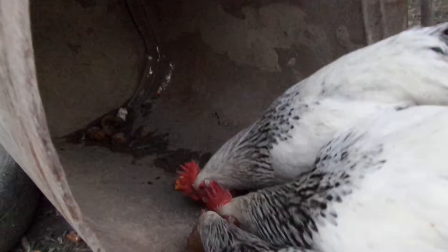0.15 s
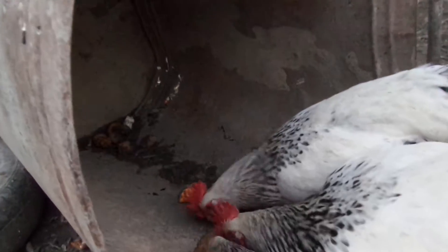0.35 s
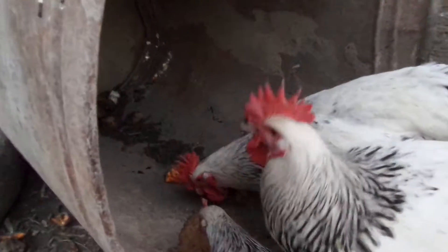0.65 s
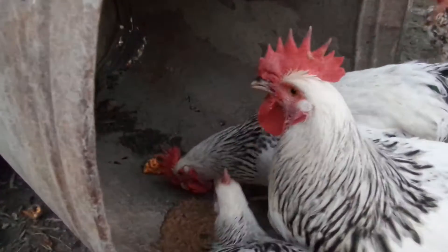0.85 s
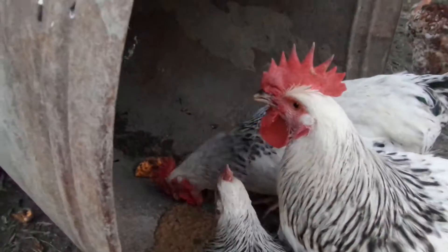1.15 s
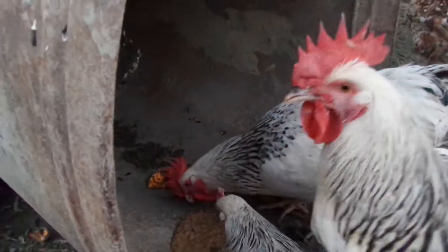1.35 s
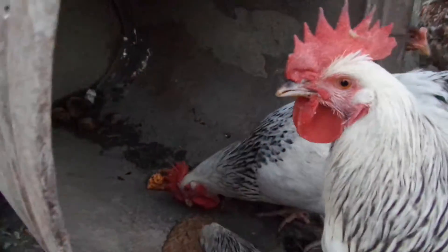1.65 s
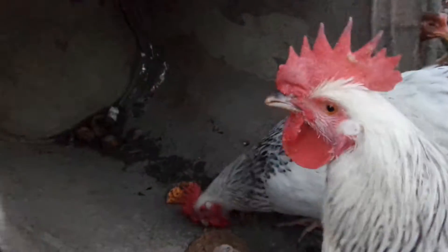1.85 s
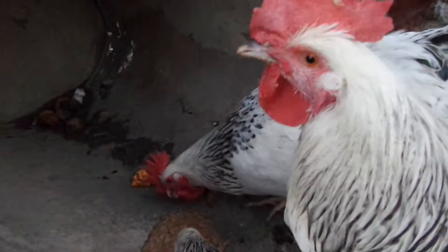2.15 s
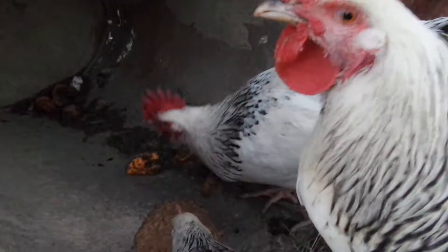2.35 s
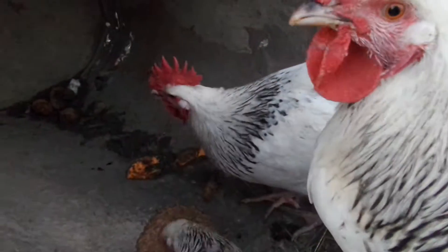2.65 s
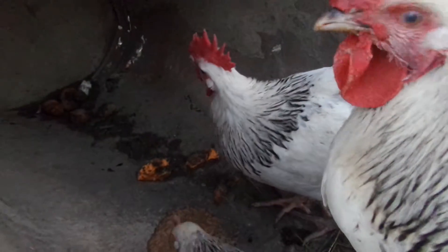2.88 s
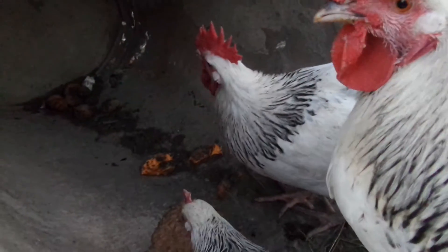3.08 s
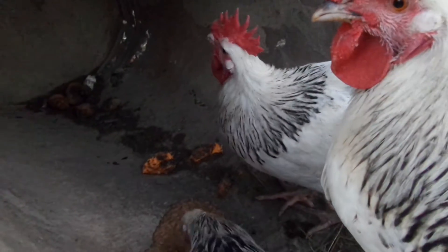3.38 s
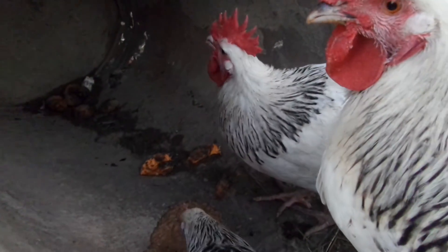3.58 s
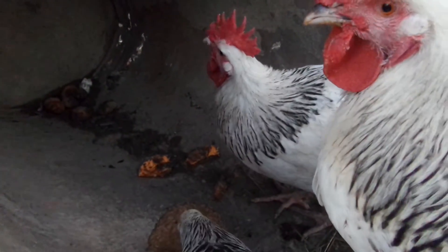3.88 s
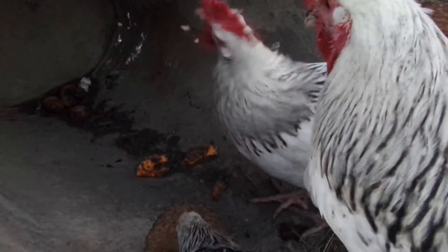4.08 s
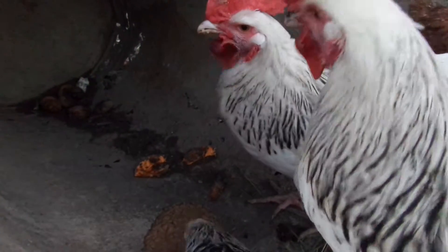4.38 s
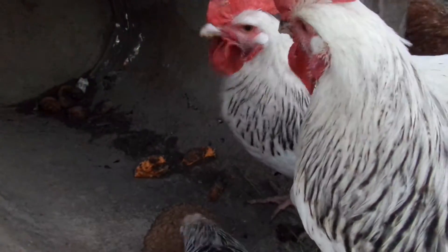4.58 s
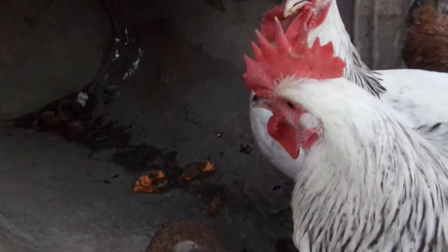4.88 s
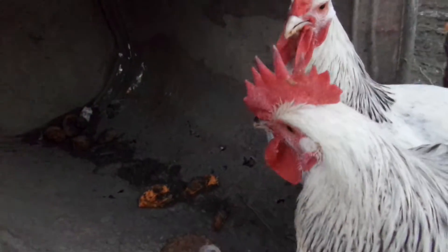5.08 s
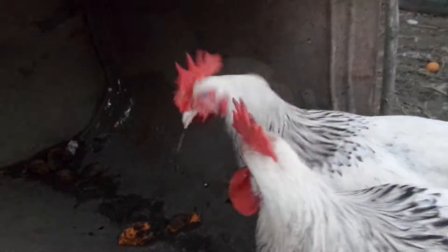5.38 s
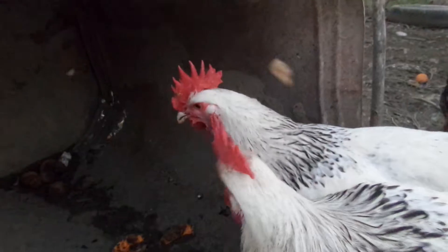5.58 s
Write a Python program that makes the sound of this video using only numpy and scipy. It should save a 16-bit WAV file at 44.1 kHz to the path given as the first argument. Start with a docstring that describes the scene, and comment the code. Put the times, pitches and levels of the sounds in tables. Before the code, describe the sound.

Close feeding hens with faint mutters, claw scrapes and dry ticks, a short run of clucks, and finally one long climbing squawk.

```python
"""Chickens feed in a concrete corner of a yard. A hen on the right clucks five times, others mutter and whine,
and the nearest bird ends with one long rising call: uneven pulses of the syrinx ring windpipe resonances;
the whines are gliding sine pairs. Beaks, claws, litter and low bumps are bursts of noise through a broad
resonance. Feathers and litter rustle as crackling noise, and far traffic and air hum as low shaped noise.
Sparse decaying taps give the reflections of the concrete."""
import sys
import numpy as np
from scipy import signal
from scipy.io import wavfile
from scipy.ndimage import uniform_filter1d

SR = 44100
rng = np.random.default_rng(int(sys.argv[2]) if len(sys.argv) > 2 else 0)


def wav_out(sig):
    """Save sig, one row per channel (or a flat mono array), as 16-bit PCM at SR to the path in sys.argv[1]."""
    wavfile.write(sys.argv[1], SR, np.round(np.clip(np.atleast_2d(sig).T, -1, 1) * 32767).astype(np.int16))


N = 252687
EDGE_HZ = 15850  # upper band limit


def gain_of(db):
    """Decibels to an amplitude factor."""
    return 10 ** (np.asarray(db) / 20)


def evened(x):
    """Scaled to rms 1."""
    return x / np.sqrt(np.mean(x ** 2) + 1e-20)


def smoothed_twice(x, size):
    """Two passes of a moving average of size samples."""
    return uniform_filter1d(uniform_filter1d(x, size=size), size=size)


def read(points, hz):
    """A spectrum table at the frequencies hz, interpolated along log frequency."""
    f, value = np.transpose(points)
    return np.interp(np.log(hz + 1), np.log(f + 1), value)


def add(mix, s, sound, pan_db=0, lag=0):
    """Mixes a sound in at s seconds; negative pan_db leans right, and the left side hears it lag samples late."""
    for side, (late, db) in enumerate([(lag, pan_db / 2), (0, -pan_db / 2)]):
        part = mix[side, round(s * SR) + late:][:len(sound)]
        part += gain_of(db) * sound[:len(part)]


def resonate(x, hz, width, order=2):
    """Shifts the curve hz down to zero, smooths order times, and shifts back: a steep resonance of gain 1."""
    turn = np.exp(2j * np.pi * np.cumsum(hz * np.ones(len(x))) / SR)
    r = np.exp(-np.pi * width / SR)
    smooth = signal.lfilter([(1 - r) ** order], np.poly([r] * order), x / turn + 1e-18)
    return 2 * (turn * smooth).real


def noise(colour, same, size, patchy_db, flicker_db):
    """Two-sided noise from random short-time spectra, with patches and a flicker shared by all bins."""
    frames, hz = 4 * N // size + 5, np.fft.rfftfreq(size, 1 / SR)
    a, b, c, d, patches = rng.standard_normal((frames, len(hz), 5)).T
    patches = uniform_filter1d(patches, size=12, axis=0)  # across frequency
    patches = evened(uniform_filter1d(patches, size=10, axis=1))  # across time
    jumps = np.minimum(rng.exponential(1, frames), 3) * (rng.random(frames) < .04)
    snaps = np.minimum(signal.lfilter([1], [1, -.88], jumps), 3.5)  # sudden rise, quick fade
    same = np.clip(same(hz), -1, 1)[:, None]  # left-right likeness
    left = a + 1j * b
    right = same * left + np.sqrt(1 - same ** 2) * (c + 1j * d)
    level_db = read(colour, hz)[:, None] + patchy_db * patches + flicker_db * snaps
    spectra = np.array([left, right]) * gain_of(level_db)
    return evened(signal.istft(spectra, nperseg=size, noverlap=3 * size // 4)[1][:, :N])


def voice(rows, pipe, breath=0.051):
    """Pulses of the syrinx, uneven in time and strength when rough, ring the windpipe.
    Rows: t/s, level/dB, pitch f/Hz, roughness 0-1, beak opening as a factor on the low resonances,
    and optionally brightness/dB on the high resonances."""
    s, *columns = np.transpose(rows)
    t = np.arange(s[0], s[-1], 1 / SR)
    effort_db, hz, rough, beak, *bright_db = (np.interp(t, s, c) for c in columns)
    jitter, force, hiss = rng.standard_normal((len(t), 3)).T
    jitter = evened(uniform_filter1d(jitter, size=150))
    turns = np.cumsum(hz * (1 + .35 * rough * jitter)) / SR  # cycles so far
    strength = gain_of(7.9 * rough * force[(turns + .5).astype(int)])  # each opening has its own force

    # the shape of the pulse keeps changing, so upper partials waver
    knots = np.arange(s[0], s[-1] + .05, .035)
    waver_db = 4.2 * rng.standard_normal((len(knots), 45)) * np.minimum(np.arange(45) / 4, 1) ** 2
    folds = 0
    for k in range(1, 45):
        partial = np.cos(2 * np.pi * k * turns) * (k * hz < EDGE_HZ)
        folds = folds + gain_of(np.interp(t, knots, waver_db[:, k])) * partial

    # hiss escapes at each opening
    air = (breath + 2.5 * rough) * hiss * np.exp(-(turns % 1) / .4)
    drive = folds * strength + air

    # the first three resonances move with the beak; neighbours alternate in sign
    low = sum((-1) ** k * gain_of(db) * resonate(drive, f * beak, w, order=4)
              for k, (f, w, db) in enumerate(pipe[:3]))
    high = sum((-1) ** k * gain_of(db) * resonate(drive, f, w) for k, (f, w, db) in enumerate(pipe[3:]))
    out = gain_of(sum(bright_db)) * high - low
    steady = np.sqrt(smoothed_twice(out ** 2, 500) + 1e-9)  # divided out, so the level curve rules
    fade = signal.windows.tukey(len(t), min(0.011 * SR / len(t), 1))
    return s[0], gain_of(effort_db) * out / steady * fade


def hits(events, width_share, grit_db, rise_s, trim_db, unlike, fizz):
    """A short burst of uneven noise rings a broad band around each pitch, a little different on each side.
    Events: t/s, level/dB before trim and pan, f/Hz, t60/s, pan/dB (negative leans right)."""
    mix, t = np.zeros((2, N)), np.arange(SR // 8) / SR
    for s, db, hz, t60, pan_db in events:
        common, apart, size = rng.standard_normal((3, len(t)))
        decay = gain_of(db + trim_db - 60 * t / np.clip(t60, .004, .4))
        shape = decay * (1 - np.exp(-t / rise_s)) * np.cos(4 * np.pi * t)  # the cosine ends the burst at zero
        grain = gain_of(grit_db * evened(uniform_filter1d(size, size=40)))
        for side, z in enumerate([common + unlike * apart, common - unlike * apart]):
            ringing = evened(resonate(z * grain, hz, width_share * hz))
            bright = evened(np.diff(z * grain, prepend=0))
            part = mix[side, round(s * SR):][:len(t)]
            burst = gain_of(pan_db * (1.5 - side)) * (ringing + fizz * bright) * shape
            part += burst[:len(part)]
    return mix


def yard_hum():
    """Far traffic and air: steady noise, heavy in the lows, alike on both sides only at low frequencies."""
    # spectrum of the hum: f/Hz, relative level/dB
    colour = [(12, -37), (30, -6), (60, 0), (80, 3), (110, -0.5), (189, 0), (403, -12.5), (707, -14.5),
              (813, -18), (1890, -19), (2640, -31), (5640, -30.5), (9100, -45.5), (15100, -25),
              (16400, -39)]
    # left-right likeness: f/Hz, correlation -1 to 1
    likeness = [(60, 0.88), (180, 0.97), (550, 0.56), (1650, -0.41), (4970, -0.25), (15000, -0.62)]
    hum = noise(colour, lambda hz: read(likeness, hz), size=2048, patchy_db=.8, flicker_db=0)
    return gain_of(-47.5 + np.array([[-1.9], [1.9]])) * hum  # leans right


def rustle():
    """Feathers and litter: fine crackling noise whose level follows the listed curve."""
    # level of the rustle; the swell near 5 s is partly the breath of the long call:
    # t/s, level/dB before the lean to the right
    curve = [(0, -49.5), (.19, -47.5), (.25, -60), (.53, -56.5), (.57, -52), (.78, -56), (.83, -46),
             (.98, -59), (1.18, -42), (1.35, -57), (1.4, -50), (1.52, -53), (1.92, -56.5), (1.98, -51),
             (2.39, -52.5), (2.57, -53.5), (2.65, -48.5), (2.71, -57), (2.84, -52), (2.89, -56.5),
             (2.99, -47.5), (3.32, -59), (3.43, -54.5), (3.7, -58), (4.13, -58.5), (4.17, -50.5),
             (4.38, -54), (4.44, -53.5), (4.74, -56), (4.94, -44.5), (5.38, -48.5), (5.73, -50)]
    # spectrum of the rustle: f/Hz, relative level/dB
    colour = [(590, -67), (1000, 3.5), (1490, -12), (1670, -2), (2090, -5), (2800, -6), (5650, -10),
              (9130, 2), (10500, -6), (15300, -8.5), (16400, -8)]
    crackle = noise(colour, lambda hz: .1 + 0 * hz, size=128, patchy_db=2.5, flicker_db=2.4)
    level_db = np.interp(np.arange(N) / SR, *np.transpose(curve))
    return crackle * gain_of(level_db + np.array([[-1.8], [1.8]]))


def mutter(s, length, db, hz, rough, beak, chest_db, bright_db):
    """A short soft note that swells and fades; the chest resonance stays put while the beak moves the next two."""
    # windpipe resonances of the flock: f/Hz, width/Hz, level/dB; the first level gives way to chest_db
    flock = [(280, 650, 1), (650, 280, 3), (950, 980, -2.5), (1300, 480, -7), (2000, 550, -2.5)]
    pipe = [(flock[0][0] / beak, flock[0][1], chest_db)] + flock[1:]
    end_hz = hz * (1 - 1.14 * length)  # pitch sags by a share of 1.14 a second
    rows = [(s, db, hz, rough, beak, bright_db), (s + length, db, end_hz, rough, beak, bright_db)]
    start, sound = voice(rows, pipe)
    swell = np.sin(np.linspace(s == 0, np.pi, len(sound)))  # a note at time 0 is already under way
    return start, 2 * sound * swell


def scrapes():
    """Claws scrape concrete: gritty mid-range bursts, wide across the two sides."""
    # scrapes: t/s, level/dB before trim and pan, f/Hz, t60/s
    claws = [(.1878, -33, 1410, .21), (0.219, -33, 1390, 0.029), (0.5, -41, 1800, 0.12),
             (0.7296, -28, 1800, 0.025), (0.752, -48, 1520, 0.04), (1.244, -40.5, 1820, .036),
             (1.61, -38, 1480, 0.037), (1.8521, -31, 1600, 0.069), (1.995, -27, 2120, 0.026),
             (2.0692, -35.5, 2000, 0.074), (2.097, -24, 1770, 0.042), (2.116, -30.5, 1370, 0.072),
             (2.4215, -34, 2640, 0.043), (2.5679, -43, 2000, 0.059), (4.517, -44, 1430, 0.14),
             (4.612, -42.5, 1580, 0.3), (5.332, -19.5, 1710, 0.06), (5.3568, -28.5, 1546, .11),
             (5.5754, -37.5, 3424, 0.041)]
    return hits([(*row, -4) for row in claws], width_share=0.59, grit_db=2.9, rise_s=0.0042,
                trim_db=5.5, unlike=0.72, fizz=0.032)


def pecks():
    """Beaks knock on the ground: fast-rising short bursts in the low mids."""
    # knocks: t/s, level/dB before trim and pan, f/Hz
    knocks = [(.313, -41, 816), (.364, -38.5, 1080), (.388, -36, 1110), (1.379, -31.5, 600),
              (1.425, -24, 710), (1.43, -27.5, 510), (5.535, -30, 990)]
    t60_s, pan_db = 0.026, -2.5
    return hits([(*row, t60_s, pan_db) for row in knocks], width_share=0.73, grit_db=2.3, rise_s=0.00041,
                trim_db=-0.24, unlike=0.52, fizz=0.054)


def ticks():
    """Grain and dry litter tick: very sharp, bright bursts."""
    # ticks: t/s, level/dB before trim and pan
    grains = [(0.6379, -44), (0.8035, -25), (0.869, -30.5), (1.3034, -34), (1.5565, -33), (1.9579, -41),
              (2.0567, -33), (2.0782, -30), (2.2136, -32.5), (2.3348, -29), (2.344, -34), (2.373, -34),
              (2.4413, -31.5), (2.522, -32), (2.613, -31), (2.826, -35), (2.9706, -29), (3.108, -37),
              (3.1487, -36.5), (3.2934, -50), (3.4261, -39), (3.5684, -32), (3.5778, -24), (3.5844, -34),
              (3.8457, -36.5), (3.9013, -37), (4.153, -29.5), (4.2133, -35), (4.4573, -43), (4.555, -38),
              (4.599, -35), (4.9492, -31), (5.471, -35), (5.6084, -39), (5.713, -43)]
    pitch_hz, t60_s, pan_db = 8900, .018, -4
    return hits([(s, db, pitch_hz, t60_s, pan_db) for s, db in grains], width_share=.7, grit_db=3, rise_s=.0003,
                trim_db=-3, unlike=.7, fizz=.6)


def low_bumps():
    """Low bumps: dull bursts of low noise."""
    # bumps: t/s, level/dB before trim and pan
    bumps = [(1.465, -30.5), (1.528, -33.5), (1.6, -39.5), (1.686, -32), (1.849, -28), (1.93, -33.5),
             (3.317, -56), (4.65, -28)]
    pitch_hz, t60_s, pan_db = 75, .16, -4.0
    return hits([(s, db, pitch_hz, t60_s, pan_db) for s, db in bumps], width_share=3.6, grit_db=2.5, rise_s=0.0068,
                trim_db=2.0, unlike=0.23, fizz=0)


def cluck(s, length, db, hz, end_hz, half_at, peak_at, rough):
    """Swells, holds and shuts while the pitch drops and the voice clears."""
    # windpipe resonances of the hen: f/Hz, width/Hz, level/dB; the beak scales the first three frequencies
    hen = [(515, 530, -2), (777, 420, 4.5), (950, 1100, -14), (1760, 690, -18), (3760, 750, -37)]
    beak, close_s, rough_floor = 1.034, .01, .13  # the floor is the share of roughness left at the end
    start_db, end_db = -10, -20  # relative to the held level
    u = np.linspace(0, 1, num=30)
    effort_db = db + np.interp(u, [0, peak_at, 1 - close_s / length, 1], [start_db, 0, 0, end_db])
    fallen = u ** (np.log(.5) / np.log(np.clip(half_at, .1, .9)))  # one half at half_at
    pitch = hz + (end_hz - hz) * fallen
    roughness = rough * (rough_floor + (1 - rough_floor) * (1 - u) ** 3)
    return voice(np.transpose([s + length * u, effort_db, pitch, roughness, beak + 0 * u]), hen)


def whine(s, length, db, hz, end_hz):
    """A thin wavering glide with its octave."""
    count = round(length * SR)
    waver = 1 + 0.027 * evened(uniform_filter1d(rng.standard_normal(count), size=500))
    phase = 2 * np.pi * np.cumsum(np.linspace(hz, end_hz, count) * waver) / SR
    tone = np.sqrt(2) * (np.sin(phase) + gain_of(-6.5) * np.sin(2 * phase))
    return s, gain_of(db) * tone * signal.windows.tukey(count, .3)


def call():
    """The long call: the beak opens when the voice is rough; brightness follows roughness and effort."""
    # from croak through clear rise to the break: t/s, effort level/dB before pan, f/Hz, roughness 0-1
    path = [(4.6, -43, 262.7, 0.21), (4.637, -40, 285.6, 0.12), (4.649, -35.5, 179, 0.79),
            (4.668, -55, 168.8, 0.45), (4.681, -33, 187.3, 0.7), (4.722, -36.5, 149.3, 0.51),
            (4.736, -28, 250, 0.01), (4.799, -25, 270.2, 0.5), (4.818, -24, 288.8, 0.05),
            (4.926, -21, 316.3, 0.04), (5.053, -19, 335.8, 0.01), (5.095, -20, 352, .04),
            (5.112, -18.5, 339, 0.02), (5.161, -20.5, 352.4, .03), (5.212, -17.5, 368, 0.01),
            (5.258, -18, 374.4, 0), (5.269, -15.5, 328.3, 0.13), (5.287, -18.5, 270.8, 0.56),
            (5.289, -52, 285.9, 0.91), (5.309, -38, 303.7, 0.97), (5.321, -59, 295.7, 0.53)]
    # windpipe resonances of the caller: f/Hz, width/Hz, level/dB; the beak scales the first three frequencies
    # and brightness lifts the levels of the rest
    rooster = [(283, 490, -2.5), (692, 680, 9.5), (1024, 370, -10), (1800, 580, -18.5), (3797, 274, -14.5),
               (5880, 200, -31), (8140, 300, -24), (10700, 690, -33), (8800, 2100, -38)]
    full_effort_db = -17.5
    rows = []
    for s, db, hz, rough in path:
        beak = 0.95 + 0.092 * rough
        bright_db = 2.5 + 13.5 * rough + 1.1 * max(db - full_effort_db, -9)
        rows.append((s, db, hz, rough, beak, bright_db))
    return voice(rows, rooster, breath=0.21)


def birds():
    """All calls, leaning right; all but the long call reach the left side a few samples late."""
    # soft mutters: t/s, length/s, level/dB before swell and pan, starting f/Hz, roughness 0-1,
    # beak opening (factor), chest level/dB, brightness/dB
    mutters = [(0, .081, -43.5, 214.7, 0.53, 0.71, -1, -7.5),
               (0.188, .08, -51.5, 225.4, 0.25, 0.79, 3.5, -4),
               (0.448, 0.031, -52.5, 253, 0.54, 0.85, -2, -22),
               (0.489, 0.08, -53, 235, 0.73, 0.71, -13, -17),
               (.693, 0.037, -51.5, 353, 0.26, 0.82, -19, -32),
               (.814, 0.044, -51.5, 317, 0.43, 0.65, 4, -6),
               (1.181, 0.034, -51.5, 246, 0.41, 0.82, -26, -27),
               (1.335, 0.035, -46.5, 298, 0.07, 1.06, 9, -18),
               (2.918, 0.039, -44, 293, 0.33, 0.54, -18, 5.5),
               (2.95, 0.062, -40.5, 280, 0.48, 1.34, -2.5, -14),
               (3.186, 0.068, -45.5, 312, 0.09, 1.04, 3.5, -5),
               (3.234, .054, -50.5, 321.5, 0.04, 0.55, 11, -7),
               (3.412, .041, -41, 324.6, 0.12, 0.62, -21, -5),
               (3.596, 0.051, -42.5, 215, 0.29, 1, 4.5, 5.5),
               (3.631, 0.035, -43, 229.7, 0.55, 1.45, 3, -24),
               (3.785, 0.054, -47.5, 204, 0.49, 0.99, 5.5, 0.5),
               (4.366, 0.017, -52, 307, 0.3, 0.87, -14, -23)]
    # clucks: t/s, length/s, held level/dB before pan, first f/Hz, last f/Hz, share of the length at which
    # half the drop is done, share at which the swell is done, roughness at the start 0-1
    clucks = [(1.509, .068, -29.5, 641, 427, .72, 1, 0.99), (1.666, 0.06, -29, 597, 443, 0.41, 0.58, 0.93),
              (1.813, 0.089, -28, 644, 452.7, .3, 0.87, 0.69),
              (1.968, 0.085, -29, 634, 484, .25, 0.5, 0.14), (2.137, .06, -26.5, 650, 442, .28, 0.5, 0.19)]
    # a bird farther off whines: t/s, length/s, level/dB of the fundamental before pan, first f/Hz, last f/Hz
    whines = [(1.734, 0.13, -49.5, 742, 806), (1.92, 0.051, -44, 885, 797), (1.976, 0.18, -47.5, 755, 759),
              (2.196, .06, -73, 890, 950)]
    mix = np.zeros((2, N))
    for row in mutters:
        add(mix, *mutter(*row), -4.0, lag=10)
    for row in clucks:
        add(mix, *cluck(*row), -4.5, lag=12)
    for row in whines:
        add(mix, *whine(*row), -4.0, lag=10)
    add(mix, *call(), -3.3)
    return mix


def walls(x):
    """Sparse taps of random sign from the concrete corner, each band dying at its own speed."""
    # decay of the reflections: f/Hz, t60/s
    decay = [(300, 0.12), (1000, 0.16), (4000, 0.26), (12000, 0.037)]
    taps = np.zeros((2, SR // 3))
    slots = np.arange(200, SR // 3 - 20, 20)  # one tap in every 20 samples
    at = slots + rng.integers(0, 20, (2, len(slots)))
    np.put_along_axis(taps, at, rng.choice([-1., 1.], at.shape), 1)
    hz, t, z = signal.stft(taps, SR, nperseg=256)
    tail = signal.istft(z * gain_of(-60 * t / read(decay, hz)[:, None]), SR, nperseg=256)[1]
    return signal.fftconvolve(x, tail / np.linalg.norm(tail[0]), axes=1)[:, :N]


def scene():
    """Near sounds with their reflections, over low bumps, rustle and the yard's hum."""
    near = birds() + scrapes() + pecks() + ticks()
    reflections = gain_of(-12) * walls(near)
    return near + reflections + low_bumps() + rustle() + yard_hum()


def record(dry):
    """The band limit: a linear-phase low-pass at EDGE_HZ."""
    low_pass = signal.firwin(511, EDGE_HZ, window=("kaiser", 9), fs=SR)
    return signal.oaconvolve(dry, low_pass[None], "same")


dry = scene()
out = record(dry)
wav_out(out)
```